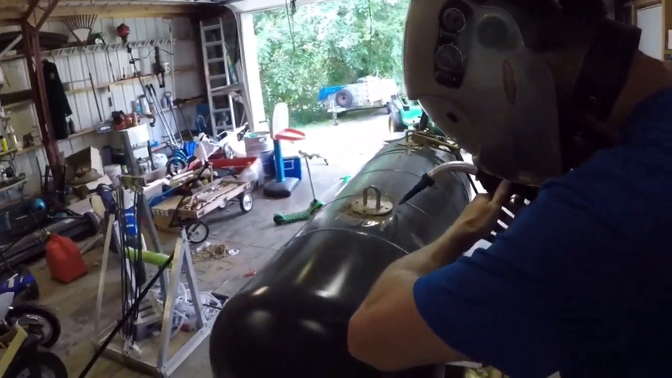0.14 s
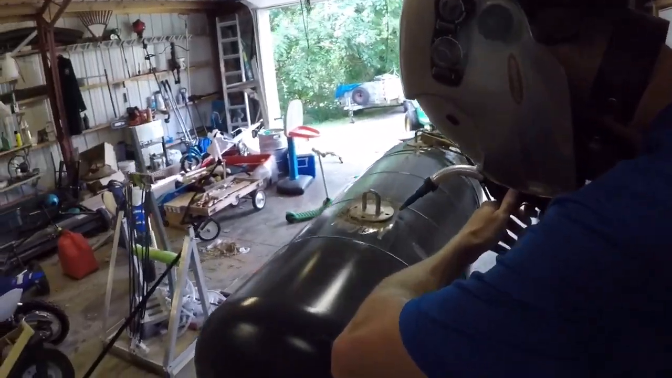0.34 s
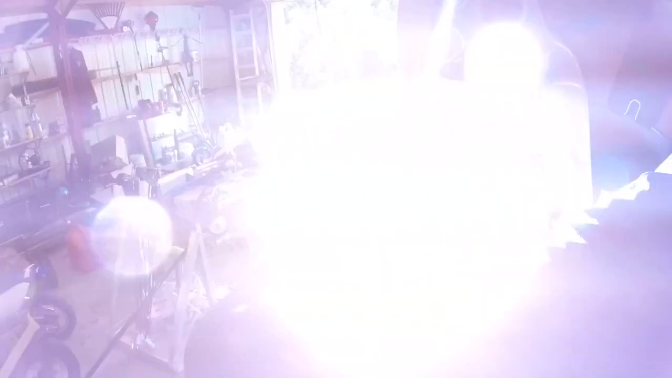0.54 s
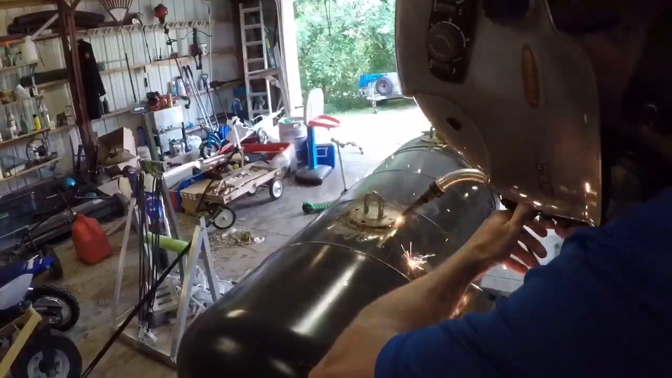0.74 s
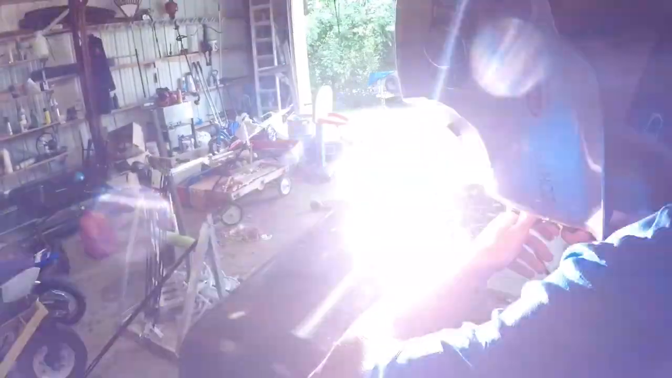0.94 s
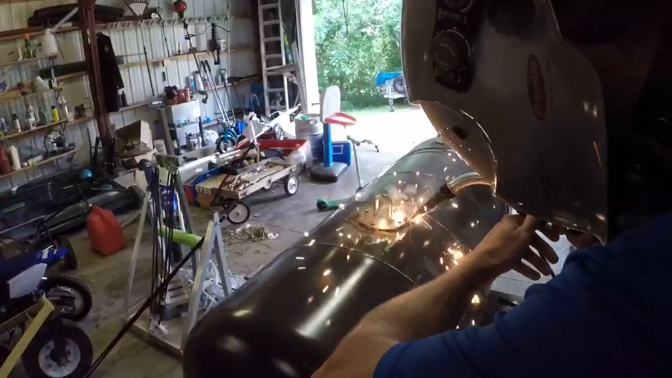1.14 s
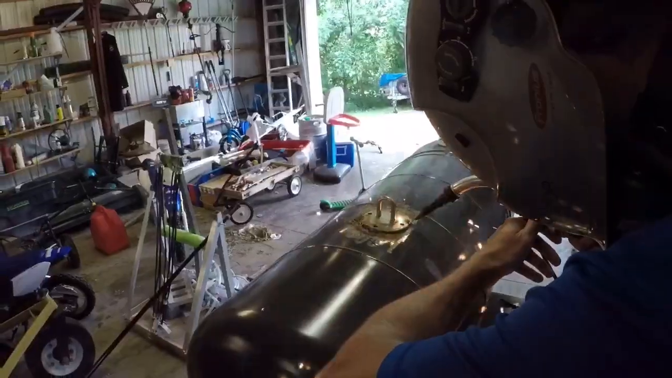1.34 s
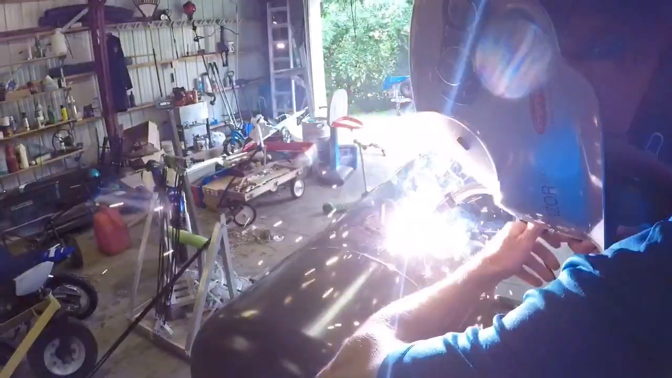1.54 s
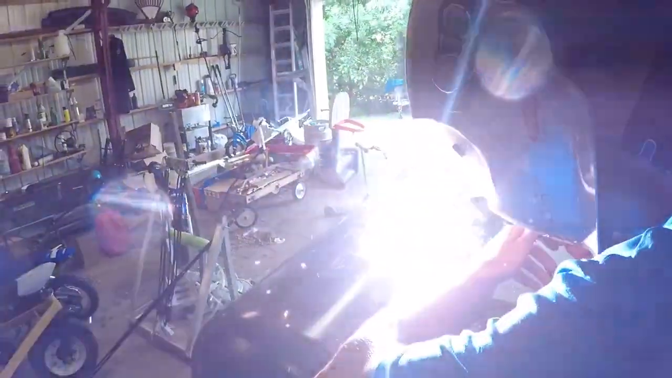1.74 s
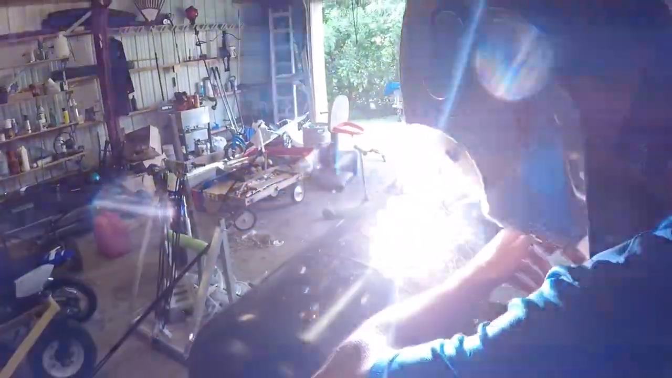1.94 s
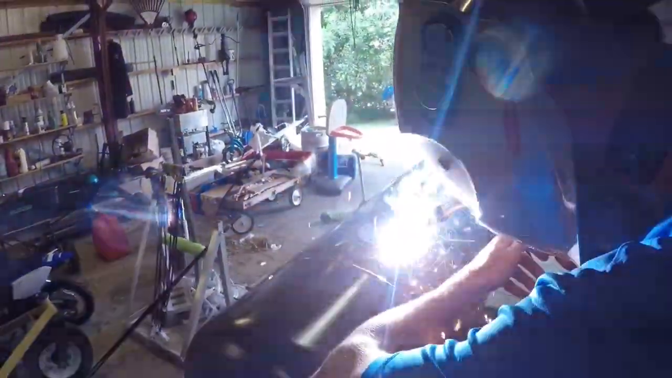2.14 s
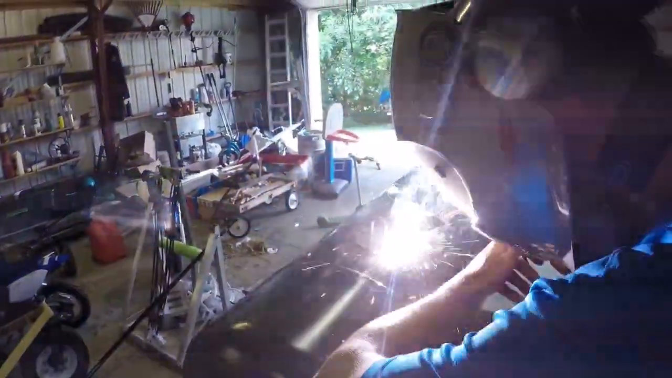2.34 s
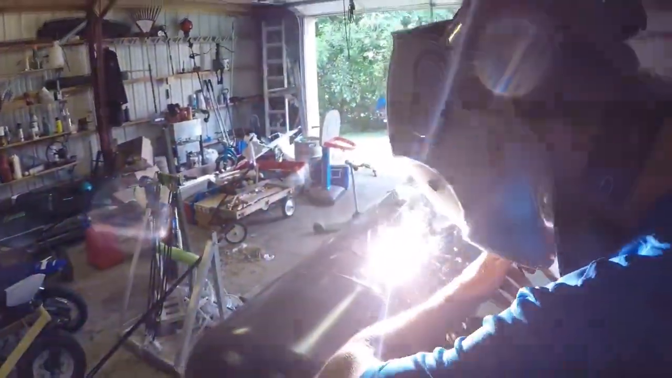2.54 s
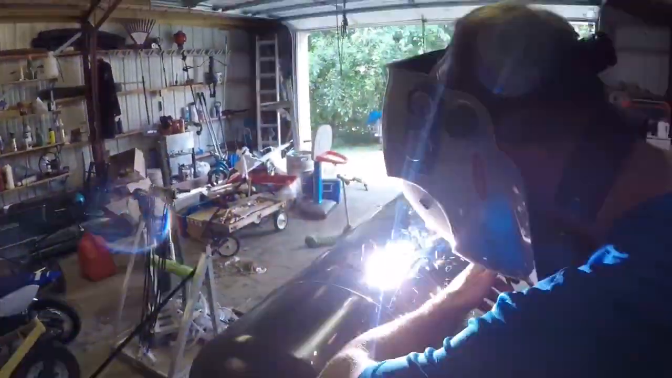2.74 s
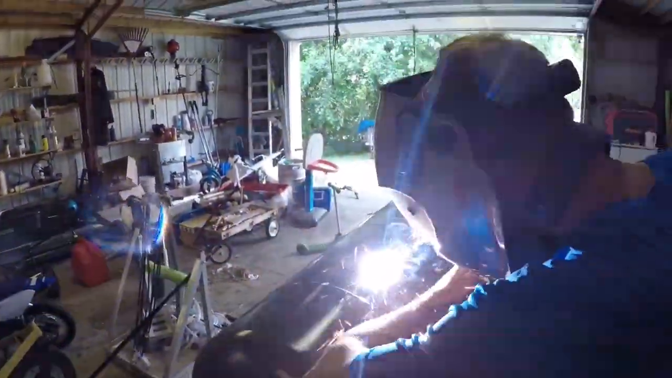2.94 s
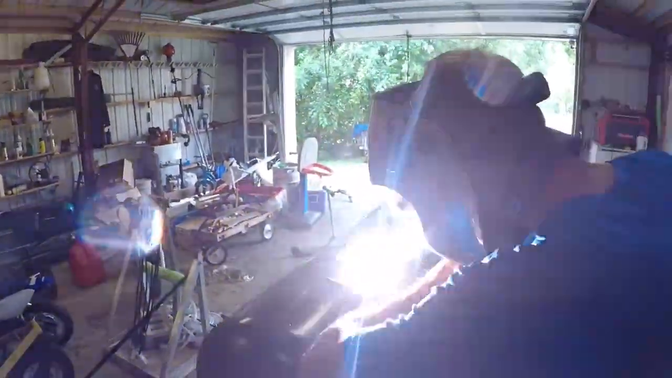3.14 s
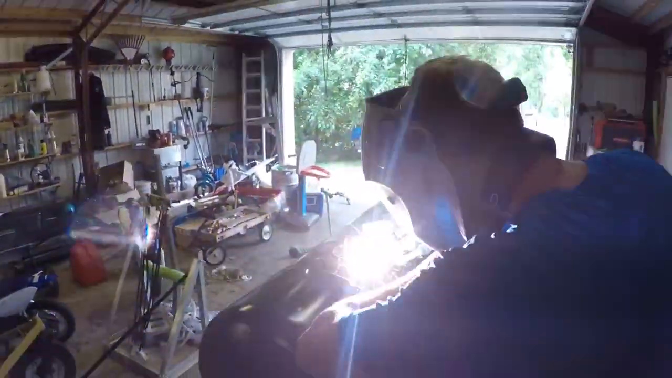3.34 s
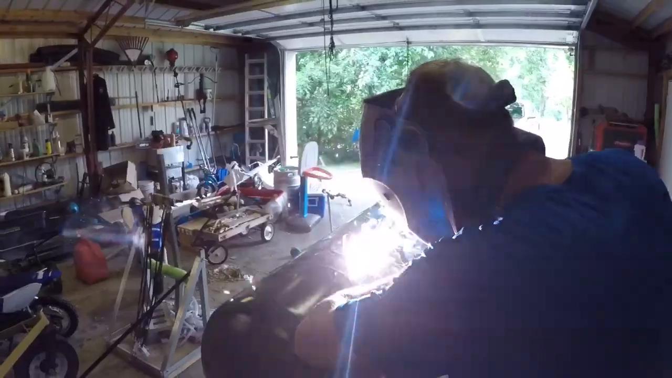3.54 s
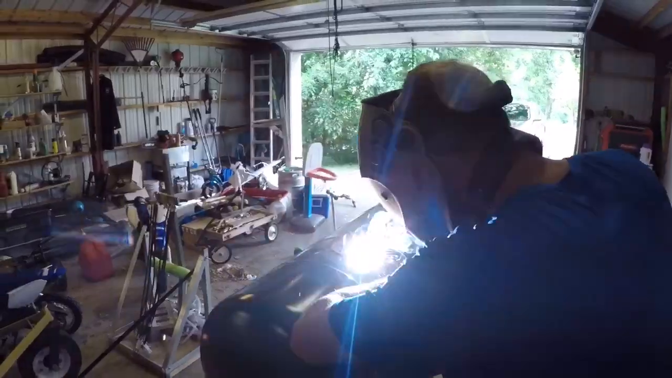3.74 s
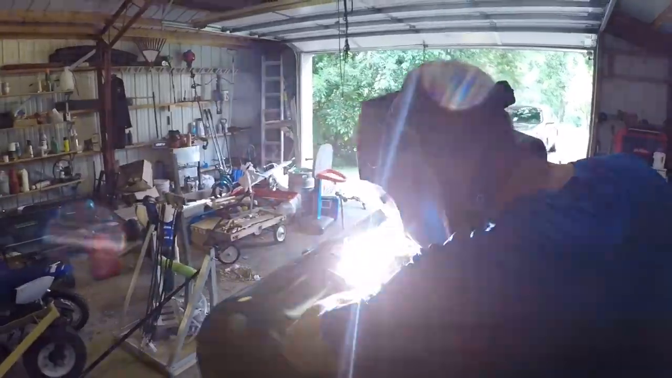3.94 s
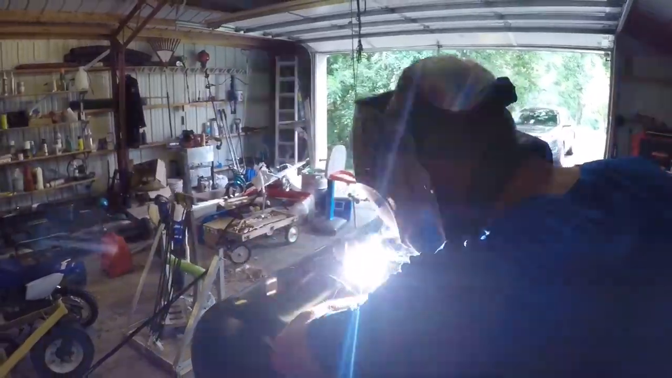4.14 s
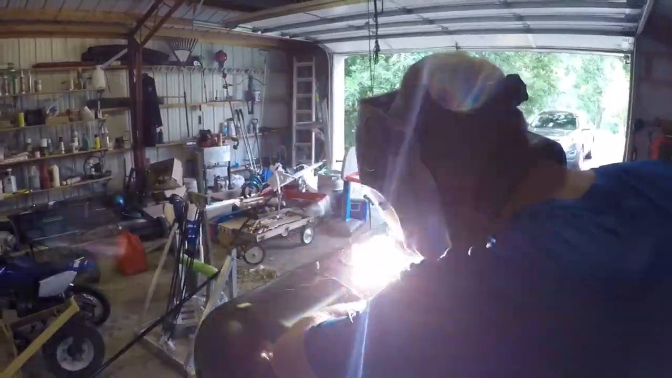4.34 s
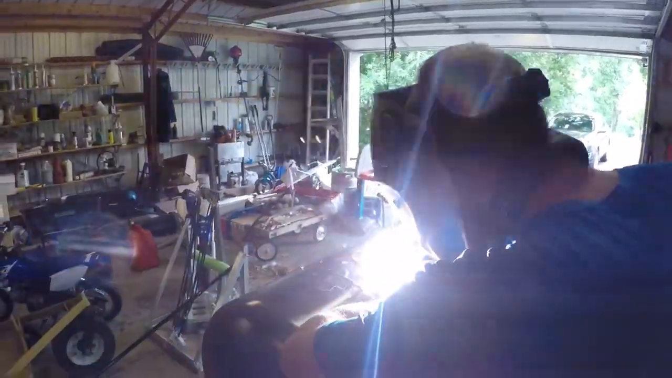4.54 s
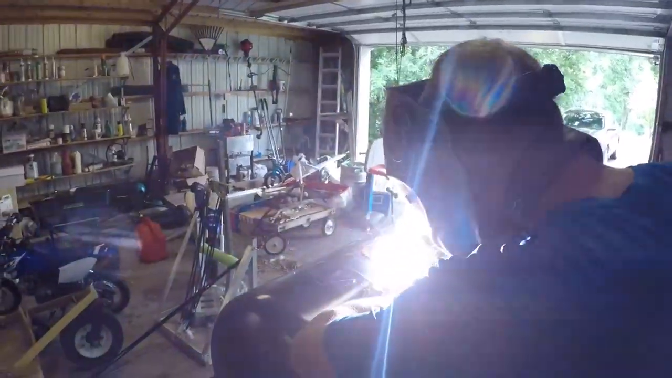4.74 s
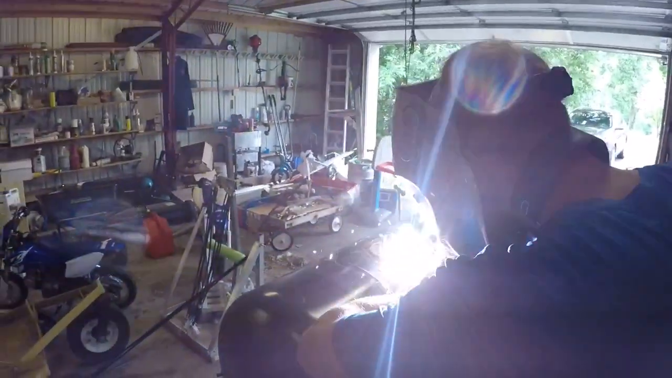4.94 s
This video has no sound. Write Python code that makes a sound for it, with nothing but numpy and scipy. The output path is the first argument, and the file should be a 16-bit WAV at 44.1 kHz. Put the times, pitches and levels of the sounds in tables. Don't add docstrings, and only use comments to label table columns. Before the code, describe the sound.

In an open garage with a faint fan drone and airy hiss, a gas valve clacks sharply. Three violent bursts of electric snaps follow, with dull booms from a hollow steel tank and short gaps of ringing echo. Then the arc stays lit, sputtering unevenly with loud snaps before becoming a denser, sizzling crackle that gradually grows. A small stereo camera microphone listens close by, bright and slightly uneven between sides.

```python
import sys
import numpy as np
from scipy import signal
from scipy.fft import rfft, irfft, next_fast_len
from scipy.io import wavfile
from scipy.ndimage import uniform_filter1d

SR = 44100
rng = np.random.default_rng(int(sys.argv[2]) if len(sys.argv) > 2 else 0)


def generate_wav(signal):
    frames = np.transpose(np.atleast_2d(signal))
    scaled = np.clip(frames, -1, 1) * 32767
    pcm = np.round(scaled).astype(np.int16)
    wavfile.write(sys.argv[1], SR, pcm)


def makeup_ratio(level_db):
    decades = np.asarray(level_db, float) / 20
    return 10 ** decades


N = 220516
TIME = np.arange(N) / SR
SIZE = next_fast_len(N + SR)
FREQ = np.arange(SIZE // 2 + 1) * SR / SIZE

ARC_ON_S = 1.46


def curve(points, hz=FREQ):
    f, v = np.transpose(points)
    return np.interp(np.log(hz + 1), np.log(f + 1), v)


def shape(x, gain):
    return irfft(rfft(x, SIZE) * gain, SIZE)[..., :N]


def causal(db):
    cepstrum = irfft(np.log(makeup_ratio(db)), SIZE)
    cepstrum[1:SIZE // 2] *= 2
    cepstrum[SIZE // 2 + 1:] = 0
    return np.exp(rfft(cepstrum))


def modes(table):
    total = 0
    for hz, width_hz, db in table:
        damping = 1j * FREQ * width_hz
        total = total + makeup_ratio(db) * damping / (hz * hz - FREQ ** 2 + damping)
    return total


def clicks(s, sizes):
    place = np.clip((s * SR).astype(int), 0, N - 1)
    return np.bincount(place, sizes, N)


def pair(a, b):
    # pitch_hz, likeness (0 to 1)
    side_likeness = [(100, 0.84), (700, 0.87), (1300, 0.18), (2700, 0.6), (3800, 1), (5200, 0.53),
                     (7000, 0.67), (11000, 0), (12500, 0.2), (15000, 0.4)]
    like = np.clip(curve(side_likeness), 0, 1)
    shared = np.sqrt(1 + like) * a
    apart = np.sqrt(1 - like) * b
    return np.array([shared + apart, shared - apart]) / np.sqrt(2)


def yard():
    # pitch_hz, level_db (per Hz)
    air_colour = [(59, -31), (100, -9), (163, -2.5), (224, -12), (634, -17.5), (5650, -30), (6990, -28.5),
                  (8640, -31), (11200, -38), (16000, -45)]
    # start_s, level_db
    drone_level = [(0, -49), (.4, -46.5), (0.799, -59), (1.299, -51), (1.7, -58.5), (2.0, -51), (2.6, -65),
                   (3.0, -51), (3.3, -50), (3.65, -45), (4.1, -53), (4.5, -48), (5, -39.5)]
    noise = pair(*rfft(rng.standard_normal((2, SIZE))))
    air = irfft(noise * makeup_ratio(curve(air_colour)), SIZE)[:, :N]
    air = air / np.std(air)
    low = shape(air, 1 / (1 + (FREQ / 500) ** 4))
    drone = low * makeup_ratio(np.interp(TIME, *np.transpose(drone_level)))
    return (air - low) * makeup_ratio(-47.5 - 4.5) + drone


def throb():
    turns_per_s, start_s = 10.585, .008
    turns = (TIME - start_s) * turns_per_s + 1
    phase = turns % 1
    sway = rng.standard_normal((2, int(turns[-1]) + 1))[:, turns.astype(int)]
    hz = 95 * 2 ** (-1.5 * phase + 0.055 * sway[0])
    swell = makeup_ratio(-52 + 1.5 * sway[1]) * np.sin(np.pi * phase) ** 0.4
    pulse = swell * np.sin(2 * np.pi * np.cumsum(hz) / SR)
    rumble = shape(rng.standard_normal((2, N)), makeup_ratio(-42.5) * modes([(66, 210, 0)]) ** 2)
    return pulse + rumble


def valve():
    # start_s, level_db, length_s
    valve_hits = [
        (0.058, -53, 0.0018),
        (.117, -27, 0.0034),
        (0.123, -30.5, 0.0028),
    ]
    # pitch_hz, width_hz, level_db
    valve_ring = [(657, 230, 6), (1920, 1200, -3), (3660, 630, 3.5), (6170, 340, 0.5), (4840, 13000, -11.5)]
    burst = 0
    for start_s, db, length_s in valve_hits:
        age = np.clip(TIME - start_s, 0, 1) / length_s
        burst = burst + makeup_ratio(db) * 2 * age * np.exp(-age)
    dull = 1 / (1 + (FREQ / 8500) ** 4)
    return shape(burst * rng.standard_normal(N) * makeup_ratio(4.5), dull * modes(valve_ring))


def tank():
    # start_s, level_db (peak)
    boom_hits = [(0.422, -23.5), (0.447, -40), (0.47, -34), (0.505, -32), (0.52, -32.5), (0.5315, -19.5),
                 (0.5429, -21.5), (0.575, -37), (0.892, -14), (0.921, -36), (0.94, -26.5), (1.372, -18.5),
                 (1.41, -31), (2.274, -33), (3.621, -36.5), (3.847, -37), (4.037, -39), (4.291, -35)]
    # pitch_hz, width_hz, level_db
    tank_ring = [(171.6, 125, 2.5), (237, 235, -4.5), (496, 210, 1.5)]
    s, db = np.transpose(boom_hits)
    soft_push = 1 / (1 + 1j * FREQ / 600) ** 2
    return shape(clicks(s + 0.00506, makeup_ratio(db + 40.5)), soft_push * modes(tank_ring))


def spitting():
    # start_s, length_s, level_db
    flurry_spells = [(0.423, .008, -30), (0.452, 0.19, -43), (0.907, 0.11, -41.5), (0.991, .02, -38),
                     (1.633, .18, -35), (1.893, 0.063, -42), (2.124, .05, -39), (2.257, 0.031, -36.5),
                     (2.39, 0.11, -45.5), (2.625, 0.035, -32), (2.824, 0.26, -40.5), (3.312, 0.22, -37.5),
                     (3.554, 0.083, -43), (3.636, 0.077, -38), (3.722, .12, -35), (3.88, 0.066, -40),
                     (4.113, .16, -34.5), (4.344, 0.31, -40.5), (4.623, 0.14, -35), (4.757, 0.19, -38),
                     (4.902, .1, -35)]
    attack_s, release_s = 0.0096, 0.027
    arc_db, growth_db_per_s = -46, 2.5
    since = TIME - ARC_ON_S
    calm = makeup_ratio(arc_db + growth_db_per_s * since) * np.clip(since / release_s, 0, 1)
    spell_power = 0
    for start_s, length_s, db in flurry_spells:
        attack = np.clip((TIME - start_s) / attack_s, 0, 1) ** 2
        overtime = np.clip(TIME - start_s - length_s, 0, None)
        spell_power = spell_power + makeup_ratio(2 * db) * attack * np.exp(-2 * overtime / release_s)
    return np.sqrt(calm ** 2 + spell_power)


def sizzle():
    drops_per_s = 2500
    chance = rng.random((4, N))
    drift = np.repeat(rng.standard_normal(N // 300 + 1), 300)
    drift = uniform_filter1d(drift, 300)[:N]
    drop_size = makeup_ratio(2.6 * -np.log(1 - chance[1]) + 2.8 * drift)
    falls = chance[0] < drops_per_s / SR
    drops = falls * drop_size * np.sign(chance[2:] - .5)
    loudness = spitting() * makeup_ratio(3.5)
    spectra = rfft(loudness * drops / np.std(drops), SIZE)
    return irfft(pair(*spectra), SIZE)[:, :N]


def short_circuits():
    # start_s, peak_db, sharpness_db, body_db
    wire_stubs = [(0.4254, -4, -20, -17), (0.4277, -5.5, -24, -19.5), (0.4467, -7, -22, -9.5),
                  (0.4573, -18, -24, -24), (0.4684, -18, -7, -7.5), (0.4733, -7.5, -20, -15),
                  (0.4817, -20, -13, -16), (0.4848, -11.5, -17, -14), (0.4912, -10.5, -27, -11.5),
                  (0.508, -24, -22, -9), (0.515, -25, -26, 4), (0.5237, -17.5, -25, -4.5),
                  (0.5375, -18, -30, 1), (0.5465, -24.5, -28, 3), (0.5673, -15.5, -30, -8.5),
                  (0.8976, -8, -16, -7.5), (0.8988, -5, -29, -10), (0.9221, -26, -18, -17),
                  (0.9399, -20, -18, -11.5), (0.9527, -20.3, -14, -9), (1.011, -19.5, -27, -6.5),
                  (1.0145, -21, -12, -8), (1.0202, -20, -24, -7), (1.0228, -8.5, -29, -8),
                  (1.3545, -43, -16, -26), (1.3759, -5, -10, -10.5), (1.3875, -8, -29, -14),
                  (1.3948, -12.5, -27, -14.5), (1.409, -19, -26, -18)]
    # start_s, peak_db, sharpness_db
    sputter_snaps = [(1.4764, -17.5, -17), (1.4873, -6, -27), (1.5102, -8.5, -14.5), (1.5276, -17.3, -19),
                     (1.5819, -14.5, -19), (1.5964, -9, -17), (1.6482, -18, -17), (1.716, -13, -17),
                     (1.7218, -17, -21), (1.7418, -16.6, -24), (1.7938, -12, -33), (1.8186, -9.5, -25),
                     (1.8358, -4, -36), (1.8479, -8, -21), (2.0426, -11, -17), (2.1064, -6, -18.5),
                     (2.2104, -7, -12), (2.2442, -13, -8), (2.2729, -10.5, -23), (2.2796, -7.5, -27),
                     (2.2922, -9, -21), (2.3004, -9.5, -29), (2.3139, -9.6, -19), (2.332, -9, -25),
                     (2.3432, -8.5, -18), (2.3624, -19, -20), (2.4992, -9.5, -21), (2.627, -8.5, -17),
                     (2.672, -12.5, -18), (2.7963, -18.5, -14)]
    # start_s, peak_db, sharpness_db
    crackle_snaps = [(2.8368, -17.5, -9), (2.8623, -12, -13), (2.8771, -7.5, -26), (2.8855, -9, -19),
                     (2.8953, -8.5, -20), (2.9406, -11, -15), (2.9841, -15.5, -19), (2.9893, -7.5, -14),
                     (3.0409, -15.5, -14), (3.047, -10.5, -18), (3.3165, -15.5, -15), (3.3296, -11.2, -17),
                     (3.4089, -12.9, -19), (3.4948, -8, -26), (3.692, -9, -22), (3.7001, -10, -19),
                     (3.7527, -13.5, -17), (3.7691, -11.3, -18), (3.811, -10.5, -19), (3.8462, -13, -19),
                     (3.8523, -8, -19), (4.1598, -13.5, -10), (4.1988, -11.5, -11), (4.2945, -1, -31),
                     (4.4223, -9.5, -19), (4.5628, -14.5, -18), (4.7197, -8, -28), (4.8333, -11, -21),
                     (4.9251, -14.5, -7), (4.9624, -12, -10)]
    # start_s, peak_db
    lone_ticks = [(1.7004, -17.5), (2.0771, -22.9), (2.1116, -18.8), (2.1647, -21.8), (2.1692, -20.6),
                  (2.2514, -17.5), (2.3846, -20.2), (2.6032, -22.5), (2.9066, -16.7), (2.9637, -15),
                  (3.0929, -15.5), (3.2093, -17.6), (3.2259, -16.9), (3.379, -16.7), (3.5197, -13.9),
                  (3.8981, -16.3), (3.9583, -15.4), (4.0529, -17.5), (4.0698, -16.3), (4.1062, -16.1),
                  (4.3478, -17.9), (4.4897, -14.6), (4.5322, -15.5), (4.55, -15.7), (4.5937, -15.3),
                  (4.6826, -13.7), (4.7864, -13.7), (4.894, -14.4), (4.9733, -12.8), (4.996, -12.6)]

    count, per_s, full_rate_db = 300, 60, -35
    luck = rng.random((3, count))
    s = ARC_ON_S + (np.arange(count) + luck[0]) / per_s
    busy = np.interp(s * SR, np.arange(N), spitting(), right=0) / makeup_ratio(full_rate_db)
    drawn_db = -21 - np.log(1 - .9 * luck[1])
    small_db = np.where(luck[2] < busy ** 4.0, drawn_db, -200)
    small_db = np.minimum(small_db, -17.5)
    small_db = small_db + 17 * np.log10(np.clip(busy, .01, 1))

    lesser = np.hstack([np.transpose(lone_ticks), [s, small_db]])
    sharp_db = -18 + 4.5 * rng.standard_normal(lesser.shape[1])
    loud_snaps = np.transpose(list(sputter_snaps) + list(crackle_snaps))
    snaps = np.hstack([loud_snaps, np.vstack([lesser, sharp_db])])
    body_db = -25 - 0.46 * snaps[1] + 2.5 * rng.standard_normal(snaps.shape[1])
    return np.hstack([np.transpose(wire_stubs), np.vstack([snaps, body_db])])


def sparks():
    s, db, sharp_db, body_db = short_circuits()
    treble = 1 / (1 + (8600 / (FREQ + 1)) ** 8)
    body = 1 / (1 + (FREQ / 2800) ** 5)
    jump = rng.standard_normal((2, len(s)))
    luck = rng.random((2, 5, len(s)))
    follows = (np.arange(5) > 0)[:, None]
    spread_s = .0005 * makeup_ratio(.5 * (db + body_db + 32.0))
    when = s - .0002 + spread_s * (luck[0] - .2) * follows
    steps = np.where(follows, .7 * (luck[1] - .5), -1)
    parts = [(1, 1 - treble - body),
             (makeup_ratio(sharp_db + 17.5), treble),
             (makeup_ratio(body_db + 15.0), body)]
    sides = []
    for side in (1, -1):
        step_size = steps * makeup_ratio(db + 11.5 + side * 1.1 * jump[0])
        arrive = (when + side * 1.2e-5 * jump[1]).ravel()
        heard = 0
        for share, band in parts:
            heard = heard + shape(clicks(arrive, (step_size * share).ravel()), band)
        sides.append(heard)
    return np.array(sides)


def garage():
    # pitch_hz, fade_s
    echo_fade = [(100, 0.23), (400, 0.69), (2000, 0.7), (6000, 0.59), (9000, 0.44), (15000, 0.13)]
    # pitch_hz, level_db
    echo_level = [(100, 2), (150, -5.5), (200, 1.5), (270, -7), (400, -5.5), (2000, -5), (4500, -10.5),
                  (9000, -0.5), (15000, -48)]
    t = np.arange(SR) / SR
    rise = np.clip((t - .0062) / .003, 0, 1)
    tails = 0
    for hz in 70 * 2 ** np.arange(0, 8.1, .5):
        band = np.exp(-(np.log2((FREQ + 1) / hz) * 2) ** 2)
        fade = rise * makeup_ratio(-60 * t / curve(echo_fade, hz))
        noise = irfft(rfft(rng.standard_normal((2, SR)), SIZE) * band, SIZE)[:, :SR]
        tail = noise * fade / np.sqrt(np.sum(fade ** 2))
        tails = tails + rfft(tail, SIZE) * makeup_ratio(curve(echo_level, hz))
    return pair(*tails)


def floor_echo():
    # start_s (delay), level_db
    floor_bounce = [
        (.0052, -34),
    ]
    gain = 1
    for delay_s, db in floor_bounce:
        gain = gain + makeup_ratio(db) * np.exp(-2j * np.pi * FREQ * delay_s)
    return gain


def ports():
    # pitch_hz, lead_radians
    port_lead = [(0, 0), (600, 3.1), (1460, 5.9), (2650, 5.5), (3150, 6.2), (4600, 6.3), (5100, 5.8),
                 (7200, 6.6), (8000, 8), (9500, 9.5), (11000, 11), (11700, 12.4), (16000, 12)]
    # pitch_hz, level_db
    port_balance = [(60, -1), (200, -7), (500, -2.5), (1200, -5), (2000, 0), (2700, -3), (4200, 0),
                    (5000, 6), (7000, 10), (7800, 3), (8400, -1.5), (11000, -2), (13000, 1.5)]
    lean = makeup_ratio(curve(port_balance) / 2)
    lag = np.exp(-1j * np.interp(FREQ, *np.transpose(port_lead)))
    cut = 1 / (1 + (125 / (FREQ + 1)) ** 12) / (1 + (FREQ / 15600) ** 30)
    return cut * np.array([lean, lag / lean])


def scene():
    # pitch_hz, level_db (per Hz)
    spark_colour = [(150, -2.5), (500, 0), (1200, -2), (2100, -3.5), (2750, -1), (3350, 3), (4700, 0.5),
                    (6500, 1.5), (7600, -1.5), (8400, -7.5), (11200, -15.5), (13000, -12), (14900, -18),
                    (16200, -14.5)]
    background = yard()
    clack = valve()
    arc = tank() + shape(sizzle() + sparks(), causal(curve(spark_colour)))
    direct = shape(arc, floor_echo()) + clack
    echo = shape(arc.mean(0) + makeup_ratio(4.0) * clack, garage())
    return shape(direct + echo + background, ports()) + throb()


def roll_off(x):
    return signal.sosfilt(signal.butter(12, 16480, fs=SR, output="sos"), x)


def record(dry):
    rounded = np.tanh(1.3 * dry) / 1.3
    return roll_off(rounded)


dry = scene()
out = record(dry)
generate_wav(out)
```